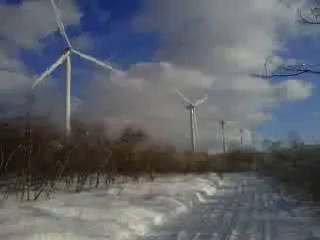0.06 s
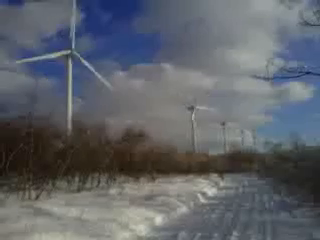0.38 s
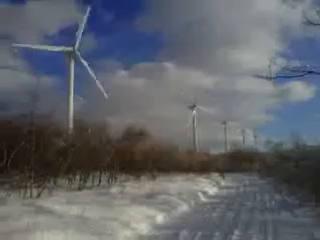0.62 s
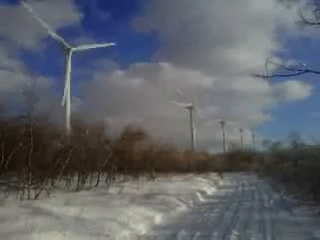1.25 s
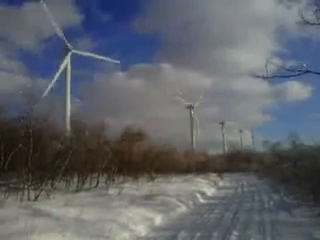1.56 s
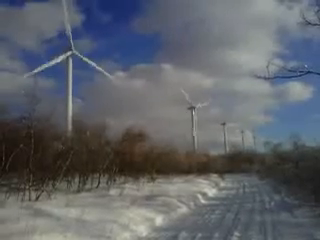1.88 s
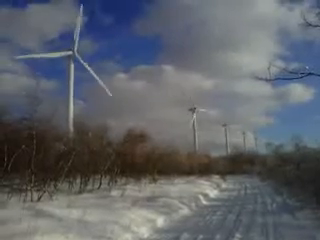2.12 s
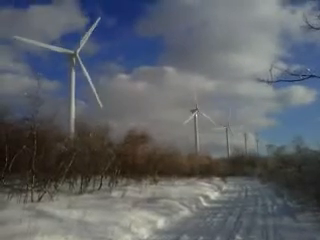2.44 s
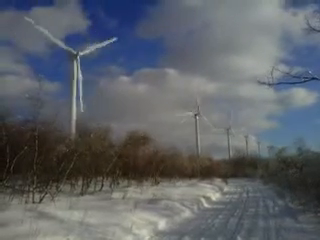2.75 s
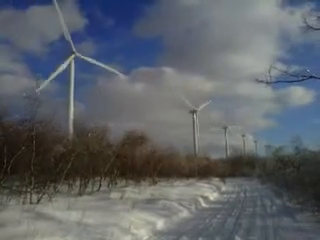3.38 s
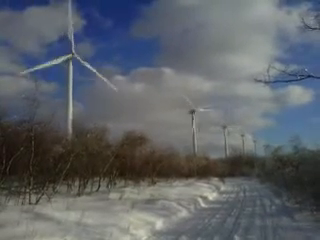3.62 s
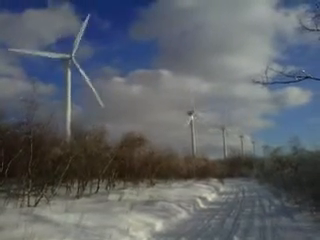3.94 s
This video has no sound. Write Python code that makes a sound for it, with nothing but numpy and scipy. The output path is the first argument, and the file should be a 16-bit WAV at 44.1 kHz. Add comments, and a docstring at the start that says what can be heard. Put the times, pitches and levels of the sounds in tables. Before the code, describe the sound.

An engine idles close by with an uneven low throb and rattling metal.

```python
"""An engine, probably a two-stroke, idles close by in a snowy field with a light wind.
Every stroke pumps a steady drone through the exhaust, but only every third to seventh fires,
with a throb and a puff of gas. Moving parts clatter, a loose part rattles and sheet metal clanks.
The microphone fades in, and loud throbs overload it, some with a knock-like blip of distortion."""
import sys
import numpy as np
from scipy import signal
from scipy.fft import rfft, irfft
from scipy.io import wavfile

SR = 44100
rng = np.random.default_rng(int(sys.argv[2]) if len(sys.argv) > 2 else 0)


def wrap_up_sound(samples):
    """Save the sound to the file named by the first command line argument, as 16-bit audio."""
    columns = np.atleast_2d(samples).T
    # keep every value between -1 and 1, then stretch to whole-number steps
    tamed = np.clip(columns, -1, 1)
    steps = np.round(tamed * 32767).astype(np.int16)
    wavfile.write(sys.argv[1], SR, steps)


N = 176400
T = np.arange(N) / SR

# engine speed: time_s, strokes_per_s
ENGINE_SPEED = [(0, 61.46), (0.4, 60.89), (0.8, 60.2), (1.3, 61.36), (1.8, 61.07), (2.2, 60.6), (2.6, 60.4),
                (3.2, 61.36), (4, 60.9)]
# firings, each moved to its nearest stroke: time_s, level_db
FIRINGS = [(0.114, 2.5), (0.212, 6.5), (0.294, 3.5), (0.376, -3), (0.474, 1.5), (0.573, -3), (0.623, 4.5),
           (0.706, -0.5), (0.772, -1.5), (0.822, 2.5), (0.905, -1.5), (0.954, -1.5), (1.004, 5.5),
           (1.119, 5), (1.184, 0.5), (1.233, 1.5), (1.282, 1.5), (1.364, 2.5), (1.446, 4), (1.543, 6.5),
           (1.658, 3.5), (1.74, 4.5), (1.854, 2.5), (1.903, -6), (1.969, 3), (2.068, 1.5), (2.15, -2.5),
           (2.216, -1.5), (2.282, -1), (2.348, -0.5), (2.431, 5.5), (2.513, 1.5), (2.58, -2.5), (2.662, 5),
           (2.761, 3), (2.844, 0), (2.91, 2.5), (2.975, 2.5), (3.057, -0.5), (3.139, 3), (3.188, -2),
           (3.237, 5), (3.318, -2), (3.367, -6.5), (3.416, 4), (3.53, 4.5), (3.645, 1.5), (3.743, -0.5),
           (3.792, 0.5), (3.841, 2), (3.891, 1.5), (3.973, 5.5)]
# tones of the drone: multiple_of_stroke_rate, level_db
DRONE_TONES = [(1, -39.5), (2, -24.5), (3, -52), (4, -46), (4.5, -46.5), (5, -49), (6.5, -51), (7, -52),
               (7.5, -53.5)]
# taps in each pair of strokes: share_of_pair, level_db
CRANK_TAPS = [(0.018, -10.5), (0.1, -5), (0.229, -1), (0.348, -14), (0.594, -8.5), (0.814, -2.5)]
# tone colour of the clatter: pitch_hz, level_db
CLATTER_COLOUR = [(130, -45), (220, -5.5), (285, 0.5), (410, -0.5), (488, -10), (572, -14), (661, -6.5),
                  (833, -12), (1290, -10.5), (2040, -19.5), (2810, -26), (3760, -26.5), (4740, -36.5),
                  (6230, -46), (7500, -82.5)]
# ringing of the engine block: pitch_hz, width_hz, level_db
BLOCK_RINGS = [(549, 18, 5.5), (611, 8.3, -9), (1011, 60, 4), (1360, 86, -22.5), (1456, 79, -8.5),
               (1607, 15, -2), (2064, 220, -0.5), (2300, 70, -7)]
# loudness of the clatter: time_s, level_db
CLATTER_LOUDNESS = [(0, 2.5), (.9, -1), (1.3, 0.9), (1.7, 0.3), (2.3, -0.5), (2.8, 0), (3.4, -0.5),
                    (4, -0.5)]
# tone colour of the wind: pitch_hz, level_db
WIND_COLOUR = [(10, -4.5), (30, 7), (70, 17), (200, 14), (800, -27), (3000, -21), (7000, -66)]
# ringing of the exhaust pipe: pitch_hz, level_db, fade_s (time to fall 60 dB)
PIPE_RINGS = [(46, -43, 0.8), (79.1, -29.5, 0.25), (112.53, -13.5, 0.12), (132.5, -35.5, 0.3),
              (170.3, -35.5, 0.29), (231.8, -21.5, 0.022), (300.5, -33, 0.098), (421, -32, 0.093)]
# tone colour of a gas puff: pitch_hz, level_db
PUFF_COLOUR = [(300, 0.5), (600, 14.5), (1500, 4), (2800, 1), (3800, -14.5), (5000, -3), (6200, -24.5),
               (7200, -45)]
# strikes of the loose part: start_s, low_ring_db, high_ring_db
PART_STRIKES = [(0.2873, 1, -17), (.3693, -20, -15), (.4581, -14, -20.5), (0.6145, -1.5, -16.5),
                (.6966, -11, -14), (.8148, -1, -18), (.895, -7, -18), (.947, -4.5, -15), (1.0135, 2.5, -18),
                (1.1106, -3, -21), (1.1765, -1, -13), (1.2753, -7, -11.5), (1.3731, -3, -14.5),
                (1.4385, 0.5, -15), (1.5352, 1.5, -11.5), (1.6489, -15, -20), (1.6676, 4, -25.5),
                (1.7312, -5.5, -17), (1.845, -7, -26.5), (1.9602, -23, -13.5), (2.0345, -22.5, -40),
                (2.057, -14, -12), (2.165, -4, -25), (2.2261, -1.5, -21), (2.274, -1.5, -36),
                (2.292, -7, -18), (2.4227, -3.5, -21.5), (2.5045, -11, -22), (2.524, 0.5, -21),
                (2.588, -1, -18.5), (2.6545, 0, -21), (2.7544, 0, -14), (2.8417, -4, -16),
                (2.9026, -6, -15), (2.921, -5, -19.5), (2.9669, -4, -26), (3.0482, -4, -15.5),
                (3.125, -7, -23), (3.226, -7, -23), (3.3115, 5, -31), (3.4085, 0.5, -10.5),
                (3.5402, 2.5, -11.5), (3.574, -8.5, -35), (3.7337, -6, -15), (3.834, 2.5, -21),
                (3.9652, -4.5, -18)]
# its low and high ringing: pitch_hz, width_hz, level_db
PART_LOW_RINGS = [(3655, 40, 3), (3810, 65, -1), (4200, 600, -14)]
PART_HIGH_RINGS = [(5300, 900, -6), (6120, 350, 0), (6600, 700, -10)]
# sheet metal clanks: start_s, pitch_hz, level_db
METAL_CLANKS = [(.489, 1490, -5), (.664, 1534, -4), (.853, 980, -9), (.888, 934, -7), (0.937, 1294, -2),
                (1.035, 1063, 1), (1.052, 1245, -5), (1.064, 1620, -7), (1.09, 1340, -16),
                (1.153, 1128, -3.5), (1.214, 1188, -1.5), (1.245, 1454, -8.5), (1.261, 1580, -5),
                (1.313, 930, -6), (1.317, 1255, -3), (1.317, 1460, -5), (1.328, 1616, -1.5),
                (1.385, 1240, -3), (1.413, 940, -2), (1.417, 1130, -3), (1.424, 1600, -3), (1.432, 1330, 2),
                (1.492, 1184, 0), (1.58, 1370, 0), (1.612, 1316, -7), (1.622, 1610, -3.5),
                (1.704, 974, -3.5), (1.708, 1330, -4), (1.999, 1474, 1.5), (2.014, 975, -2),
                (2.382, 1525, -1), (2.463, 925, 0), (2.463, 1430, -0.5), (2.567, 1400, -4),
                (2.706, 1627, -4), (2.805, 1006, 1), (2.958, 1180, -5), (3.1, 1604, -4), (3.35, 957, -1),
                (3.564, 1565, -4), (3.579, 1223, -3), (3.618, 1266, -8), (3.806, 1440, -13),
                (3.903, 1440, -1)]
# knock-like blips of microphone distortion: time_s, low_tones_db, high_tones_db
OVERLOAD_KNOCKS = [(1.01, 1.5, -4), (1.139, 2, 1.5), (1.466, 2, -1.5), (1.549, -2, -10), (1.663, 1, -18),
                   (1.858, 1.5, 1), (2.674, -13, -3), (3.245, -18, -3.5), (3.545, -5.5, -3.5),
                   (3.666, -1, -4)]
# tones of one blip: pitch_hz, level_db
OVERLOAD_TONES = [(330, -2), (450, -11), (630, -10), (800, -12.5), (930, -17)]


def amp(db):
    """Turn decibels into a gain."""
    return 10 ** (np.asarray(db) / 20)


def unit(x):
    """Scale a sound to an average (rms) level of 1."""
    return x / np.sqrt(np.mean(x ** 2) + 1e-20)


def add(mix, start_s, sound):
    """Mix a sound in at a given time."""
    part = mix[max(round(start_s * SR), 0):][:len(sound)]
    part += sound[:len(part)]


def colour(x, points):
    """Give a sound a tone colour, at level 1."""
    hz, db = np.transpose(points)
    curve_db = np.interp(np.log(np.fft.rfftfreq(N, 1 / SR) + 1), np.log(hz + 1), db)
    return unit(irfft(rfft(x) * amp(curve_db), N))


def drift(rate_hz):
    """A slow random wander, at level 1."""
    keep_slow = np.exp(-(np.fft.rfftfreq(N, 1 / SR) / rate_hz) ** 2)
    return unit(irfft(rfft(rng.standard_normal(N)) * keep_slow, N))


def resonate(x, hz, width_hz):
    """Let a sound ring around one pitch."""
    return signal.lfilter(*signal.iirpeak(hz, hz / width_hz, SR), x)


def rough_tone(hz, roughness):
    """A grainy tone that follows a pitch curve."""
    grain = signal.lfilter(*signal.butter(1, 90, fs=SR), rng.standard_normal(len(hz)))
    phase = 2 * np.pi * (np.cumsum(hz) / SR + rng.random())
    return np.sin(phase) + roughness * unit(grain) * np.cos(phase)


def drone(strokes, firings):
    """The exhaust pumps a little unevenly, swelling just before each firing."""
    swell_s, lead_strokes = 0.01, 0.2835
    swell = 1 + 0.11 * sum(np.exp(-((T - s) / swell_s + 1) ** 2) for s, _ in firings)
    phase = 2 * np.pi * (strokes + lead_strokes)
    return -swell * sum(amp(db + 1.1 * drift(27)) * np.cos(k * phase) for k, db in DRONE_TONES)


def clatter(strokes):
    """Taps at set points of the crank's turn, over an even whirr, ring the engine block."""
    tap_s, spread_db, whirr_db = 0.0034, 7.5, -2.5
    taps, pairs = np.zeros(N), np.arange(int(strokes[-1] / 2))
    for share, db in CRANK_TAPS:
        late, size = rng.standard_normal((len(pairs), 2)).T
        times = np.interp(2 * (pairs + share), strokes, T) + 0.0019 * late
        samples = np.clip(times * SR, 0, N - 1).astype(int)
        np.add.at(taps, samples, amp(db + spread_db * np.minimum(size, 1)))
    fading_taps = signal.lfilter([1], [1, -np.exp(-1 / (tap_s * SR))], taps)
    shaking = (amp(whirr_db) + fading_taps) * rng.standard_normal(N)
    cut_bass = signal.butter(4, 214, "high", fs=SR, output="sos")
    body = signal.sosfilt(cut_bass, colour(shaking, CLATTER_COLOUR))
    block = sum(amp(db) * unit(resonate(shaking, hz, width)) for hz, width, db in BLOCK_RINGS)
    loudness = amp(np.interp(T, *np.transpose(CLATTER_LOUDNESS)))
    return loudness * (amp(-41) * unit(body) + amp(-56.5) * unit(block))


def wind():
    """Air rushes softly, in gusts."""
    gust_db = 3.5 * drift(rate_hz=1.6)
    return amp(-46.5 + gust_db) * colour(rng.standard_normal(N), WIND_COLOUR)


def throbs(firings):
    """Each firing makes the exhaust pipe ring, swelling fast and dying away."""
    lead_s, rise_s = 0.0053, 0.003
    out, t = np.zeros(N), np.arange(SR // 5) / SR
    rise = 1 - np.exp(-t / rise_s)
    for s, db in firings:
        for hz, ring_db, fade_s in PIPE_RINGS:
            detune, size = rng.standard_normal(2)
            tone = -np.sin(2 * np.pi * hz * (1 + 0.011 * detune) * t)
            level = amp(db + ring_db + 0.2 * size - 60 * t / fade_s)
            add(out, s - lead_s, level * rise * tone)
    return out


def puffs(firings):
    """Gas hisses briefly around each firing."""
    delay_s, puff_s = 0.004, 0.0081
    level = sum(amp(db) * np.exp(-((T - s - delay_s) / puff_s) ** 2) for s, db in firings)
    return amp(-59) * colour(level * rng.standard_normal(N), PUFF_COLOUR)


def rattle(firings):
    """A loose metal part shakes with every firing and often strikes harder, bounces and buzzes on."""
    strike_s, buzz_s, bounce_s, bounce_db = 0.0058, 0.078, 0.007, -3.5
    t = np.arange(SR // 10) / SR
    shape = np.exp(-t / strike_s) + amp(-27.5) * np.exp(-t / buzz_s)
    strikes = list(PART_STRIKES)
    for s, _ in firings:
        for lag_s in (-0.006, 0.011):  # a faint shake before and after the firing
            start_s = s + lag_s + 0.0024 * rng.standard_normal()
            low_db, high_db = -28 + 4 * rng.uniform(-0.27, 1, 2)
            strikes.append((start_s, low_db, high_db))
    low, high = np.zeros((2, N))
    for s, low_db, high_db in strikes:
        for bounce in range(3):
            start_s = s + bounce * bounce_s * rng.uniform(0.8, 1.2)
            burst = shape * rng.standard_normal(len(t))
            add(low, start_s, amp(low_db + bounce * bounce_db) * burst)
            add(high, start_s, amp(high_db + bounce * bounce_db) * burst)
    return amp(-30) * sum(amp(db) * resonate(bursts, hz, width)
                          for bursts, rings in ((low, PART_LOW_RINGS), (high, PART_HIGH_RINGS))
                          for hz, width, db in rings)


def clanks():
    """Loose sheet metal rings briefly, now at one pitch, now at another."""
    rise_s, decay_s = 0.0063, 0.013
    out, t = np.zeros(N), np.arange(SR // 10) / SR
    shape = (1 - np.exp(-t / rise_s)) * np.exp(-t / decay_s)
    for s, hz, db in METAL_CLANKS:
        add(out, s, amp(-34.5 + db) * shape * rough_tone(np.full(len(t), hz), roughness=0.25))
    return out


def overload_knocks():
    """Short, rising tones imitate the blips of distortion as loud throbs overload the microphone."""
    blip_s, split_hz, climb_per_s = 0.0072, 550, 14.14
    out, t = np.zeros(N), np.arange(-SR // 30, SR // 30) / SR
    shape = np.exp(-(t / blip_s) ** 2)
    for s, low_db, high_db in OVERLOAD_KNOCKS:
        for hz, db in OVERLOAD_TONES:
            level = amp(-29.5 + db + (low_db if hz < split_hz else high_db))
            tone = rough_tone(hz * np.exp(climb_per_s * t), roughness=0.32)
            add(out, s + t[0], level * shape * tone)
    return out


def scene():
    """Count the strokes, put each firing on one, and mix all the sounds."""
    strokes = np.cumsum(np.interp(T, *np.transpose(ENGINE_SPEED))) / SR
    firings = []
    for s, db in FIRINGS:
        nearest_stroke = np.round(np.interp(s, T, strokes))
        firings.append((np.interp(nearest_stroke, strokes, T), db))
    metal = clatter(strokes) + clanks() + rattle(firings)
    exhaust = drone(strokes, firings) + throbs(firings)
    return (metal + exhaust + overload_knocks() + puffs(firings) + wind())[None]


def record(dry):
    """The microphone flattens the loud throbs, fades in and loses the highest treble."""
    overload_db, hardness, treble_hz, top_hz = -20.7, 10, 2500, 7150
    open_s, open_db, fade_s = 0.1003, -9.5, 0.24
    flattened = dry / (1 + abs(dry / amp(overload_db)) ** hardness) ** (1 / hardness)
    # the treble escapes the overload
    treble = signal.filtfilt(*signal.butter(2, treble_hz, "high", fs=SR), dry - flattened)
    since_s = np.maximum(T - open_s, 0)
    fade_in = np.minimum(since_s / 0.0056, 1) * amp(open_db * np.exp(-since_s / fade_s))
    cut_top = signal.firwin(401, top_hz, window=("kaiser", 9), fs=SR)
    return signal.oaconvolve((flattened + treble) * fade_in, cut_top[None], "same")


dry = scene()
out = record(dry)
wrap_up_sound(out)
```